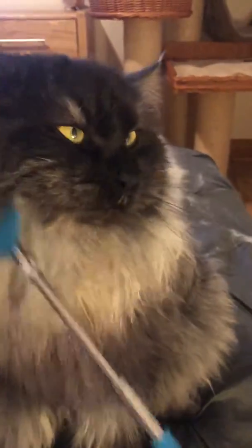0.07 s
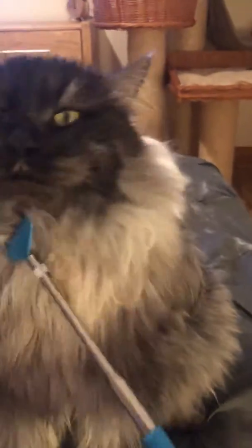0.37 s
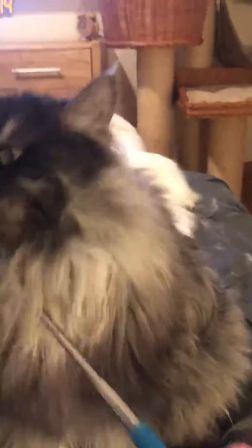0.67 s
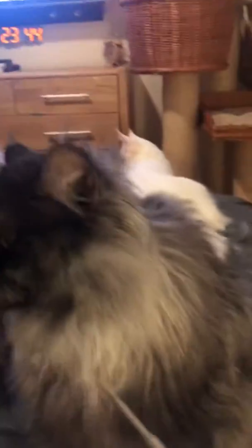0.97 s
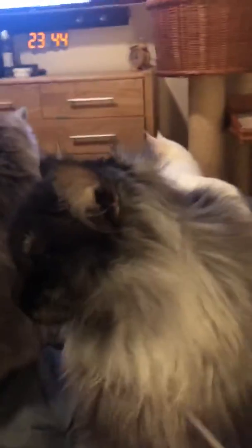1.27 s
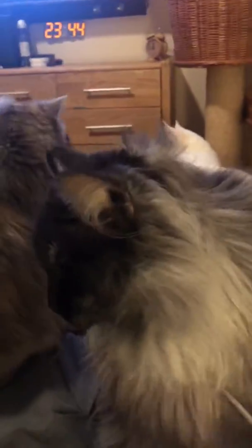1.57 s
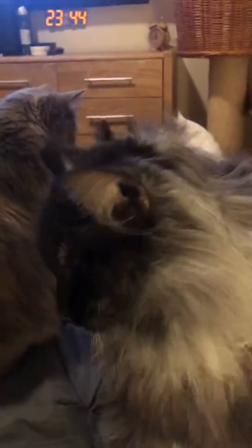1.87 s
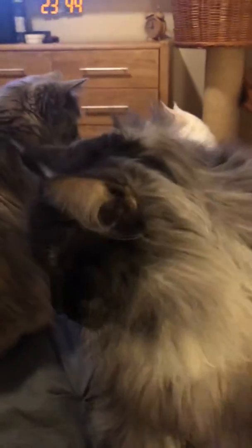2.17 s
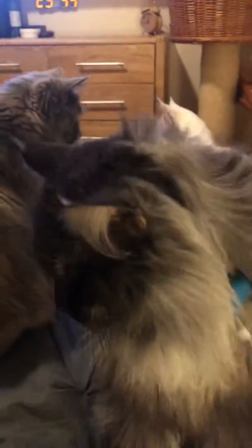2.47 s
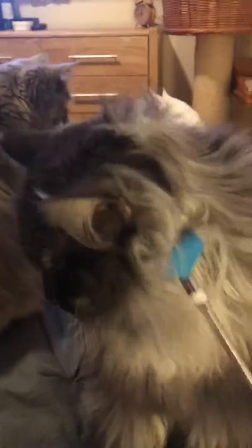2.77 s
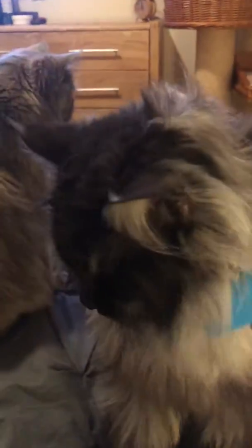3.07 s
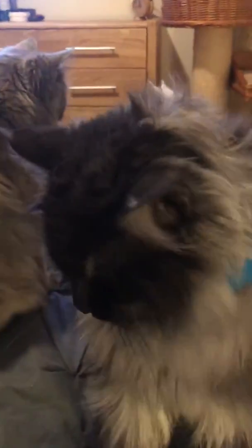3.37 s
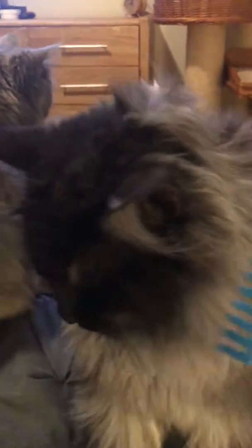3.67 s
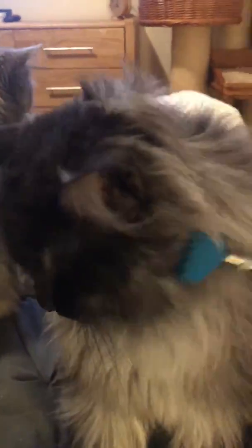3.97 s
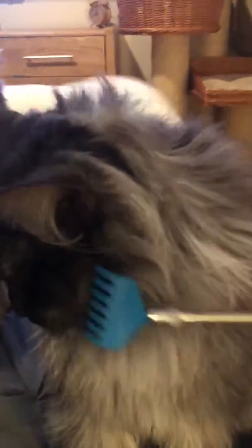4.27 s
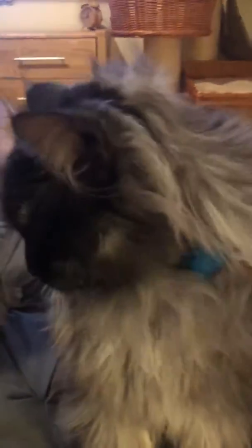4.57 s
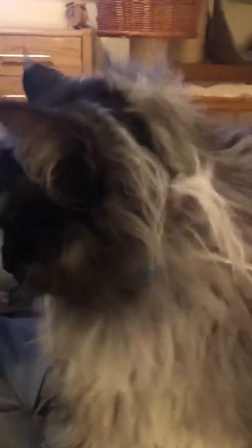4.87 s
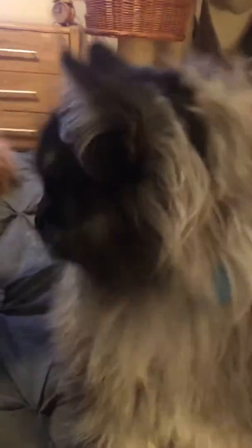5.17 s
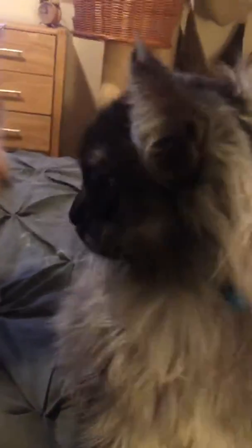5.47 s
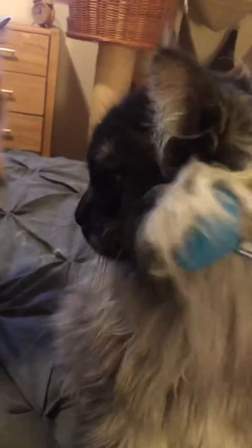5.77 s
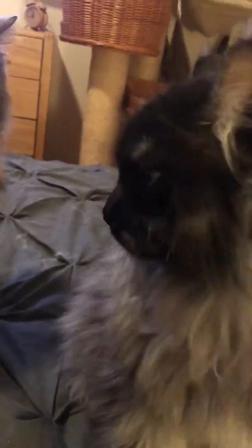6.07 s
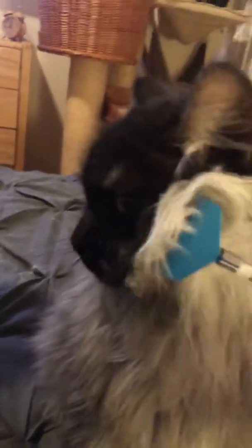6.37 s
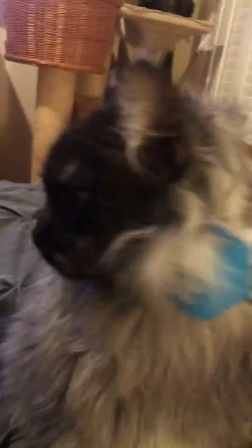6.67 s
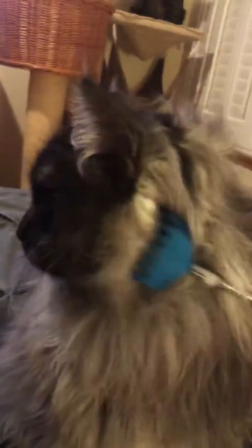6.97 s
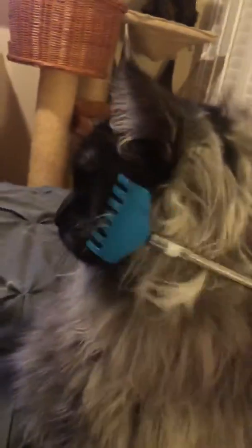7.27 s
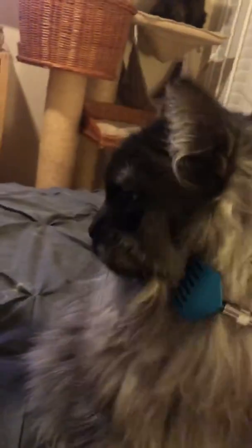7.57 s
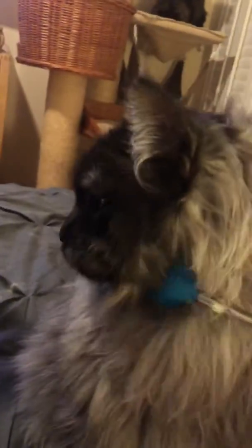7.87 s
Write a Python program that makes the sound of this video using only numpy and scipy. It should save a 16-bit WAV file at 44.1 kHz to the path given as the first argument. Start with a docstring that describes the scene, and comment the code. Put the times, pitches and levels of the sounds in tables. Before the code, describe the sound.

A plastic scratcher combs softly through a cat's fur in a quiet room, with a few dull handling bumps and one harder drag.

```python
"""A quiet room, microphone close to a long-haired cat on a bed, a faint mains hum underneath throughout.
A plastic scratcher on a thin telescopic steel rod starts with light strokes: hairs slip off the tines and
make the rod ring faintly, the fur swishes, and deeper strokes rub the coat. From about 4 s come dull
handling bumps, light knocks and shifting bedding. At 5 s the scratcher tears through a tangle and drags
hard; a few more knocks follow near 6 s, then the strokes are gentle again."""
import sys
import numpy as np
from scipy import signal
from scipy.fft import rfft, irfft, next_fast_len
from scipy.io import wavfile

SR = 44100
rng = np.random.default_rng(int(sys.argv[2]) if len(sys.argv) > 2 else 0)


def wav_out(sig):
    """Save sig, one row per channel (or a flat mono array), as 16-bit PCM at SR to the path in sys.argv[1]."""
    wavfile.write(sys.argv[1], SR, np.round(np.clip(np.atleast_2d(sig).T, -1, 1) * 32767).astype(np.int16))


N = 349713
TIME = np.arange(N) / SR
FREQS = np.maximum(np.fft.rfftfreq(next_fast_len(N, True), 1 / SR), 1)

# Levels are relative: each source applies its own gain on top.
# room tone: (frequency [Hz], level [dB])
AIR_COLOUR = [(15, -19), (25, -40), (44, -2), (71, -8.5), (101, -4), (129, -11.5), (198, -5), (221, -9.5),
              (523, -13.5), (614, -16.5), (684, -16.5), (1110, -19), (5010, -30.5), (6210, -31),
              (15500, -34.5)]
# mains hum: (frequency [Hz], level [dB])
HUM_PARTIALS = [(100, -75.5), (200, -82.5)]
# the hum swells as the microphone moves: (time [s], level [dB])
HUM_SWELL = [(0, 3), (1, -3.5), (2.2, 6.5), (3.3, -3), (5, 6.5), (6.4, -3), (7.2, 6), (7.93, 5)]

# the bedding shifts under cat and arm: (time [s], length [s], level [dB])
BEDDING_SHIFTS = [(0.646, 0.34, -74), (1.5, 0.99, -73), (3.8, 0.3, -63.5), (4.097, 0.1, -51.5),
                  (4.25, 0.07, -55.5), (4.966, 0.11, -52.5), (5.27, 0.24, -66), (5.723, 0.21, -64),
                  (7.15, 0.7, -74)]
# spectra of the quilt and of scuffed cloth: (frequency [Hz], level [dB])
BEDDING_COLOUR = [(40, 4), (70, 5.5), (130, 6), (220, 2.5), (420, -6), (800, -26), (2000, -20), (8000, -34)]
CLOTH_COLOUR = [(60, -3), (320, 3), (600, -4), (1000, -11.5), (2000, -16.5), (4000, -19), (8000, -29),
                (15000, -32)]
# light knocks and ticks of the tool: (time [s], level [dB], pitch [Hz])
KNOCKS = [(0.451, -57.5, 4930), (1.834, -57, 1550), (2.172, -57, 5500), (3.042, -59, 2600),
          (3.071, -51, 1100), (4.166, -44, 700), (4.185, -39.5, 550), (4.203, -46, 545), (5.914, -48, 1700),
          (5.920, -42, 5400), (5.924, -39, 854), (5.935, -41.5, 570), (5.944, -44, 560),
          (7.139, -56.5, 6000)]
# one sharper rap on the rod: (time [s], level [dB])
RAP = (4.175, -36)
# dull handling bumps: (time [s], level [dB], pitch [Hz], cloth scuff [dB])
BUMPS = [(0.771, -60.5, 150, -89), (0.951, -56, 140, -74), (1.698, -61.5, 188, -74), (2.847, -64, 195, -83),
         (3.036, -69, 233, -99), (4.18, -51.5, 176, -62), (4.510, -25.5, 250, -42.5),
         (4.533, -20, 181, -57.5), (4.612, -21.5, 243, -44.5), (4.637, -22, 208, -71),
         (4.811, -30, 207, -51.5), (4.824, -25.5, 138.6, -61), (4.974, -45, 221, -72),
         (4.984, -35.5, 170, -78), (5.010, -41.5, 123, -82), (5.287, -50, 171, -72), (7.904, -49, 136, -67)]
# low modes the bumps set ringing: (frequency [Hz], level [dB], t60 [s])
BUMP_MODES = [(113, 4.5, 0.26), (154.8, -6, 0.42), (190.9, 10.5, 0.18), (227, 12.5, 0.125), (314, 1, 0.1),
              (366, 4.5, 0.072), (465, 5.5, 0.09), (552, -2, 0.11), (650, 3, .16), (765, 3, .16)]

# a tine snags on a tuft and snaps free: (time [s], level [dB])
SNAGS = [(0.608, -66.5), (0.752, -66), (5.267, -58), (5.305, -54), (5.402, -58), (5.675, -62)]
# the scratcher tears through a tangle: (time [s], attack [s], length [s], level [dB])
TANGLE = (5, 0.022, 0.032, -45)
# modes of its plastic head: (frequency [Hz], width [Hz], level [dB])
HEAD_MODES = [(445, 36, 5), (1130, 360, 1.5), (1550, 77, 3), (2450, 300, 3), (3240, 240, -7),
              (4610, 310, 6.5), (6350, 120, -1), (8900, 270, -3), (10300, 99, -3)]
# the tines sink in and drag through the fur: (time [s], attack [s], length [s], swish [dB], rub [dB])
DRAGS = [(0.595, 0.02, 0.096, -74, -71), (0.73, 0.025, 0.032, -65.5, -67.5),
         (0.871, 0.035, 0.17, -74.5, -77), (1.05, 0.031, 0.06, -70.0, -70.5),
         (1.368, 0.056, 0.11, -69, -70), (1.47, 0.026, 0.111, -75, -77.0),
         (2.075, 0.037, 0.095, -75.5, -75), (2.263, 0.03, 0.206, -79, -86), (2.787, 0.037, 0.043, -76, -72),
         (3.873, 0.052, 0.51, -80, -72), (4.28, 0.055, 0.27, -75.5, -70), (4.847, 0.04, 0.17, -70, -69.5),
         (5.021, 0.027, 0.056, -51, -54), (5.111, 0.033, 0.098, -71, -69.5),
         (5.235, 0.047, 0.049, -55.5, -58.5), (5.29, 0.021, 0.071, -52.5, -57.5),
         (5.383, 0.023, 0.082, -54.5, -60), (5.493, 0.035, 0.08, -66, -69.5),
         (5.638, 0.054, 0.056, -57.0, -70), (5.74, 0.04, 0.156, -74, -75),
         (7.135, 0.064, 0.255, -75.5, -72.5), (7.371, 0.047, 0.108, -66.5, -68),
         (7.494, 0.033, 0.22, -68.5, -73.5), (7.754, 0.026, 0.19, -66.5, -71.5)]
# the swish sinks in pitch as a stroke slows: (time [s], centre [Hz])
SWISH_CENTRE = [(0, 3920), (4.9, 4100), (5.06, 4830), (5.2, 4930), (5.33, 4370), (5.55, 3983), (5.72, 3704),
                (7.93, 3755)]
# the tines skim the coat:
# (time [s], attack [s], length [s], level [dB], rod's lowest mode [dB], rod's top mode [dB])
STROKES = [(0.214, 0.055, 0.071, -68, -4, 8), (0.289, 0.03, 0.064, -76, 2.5, 9),
           (0.589, 0.028, 0.16, -73.5, 2, 1), (1.038, 0.04, 0.11, -75.5, 4, 4),
           (1.43, 0.13, 0.19, -72.5, -2, 0), (1.938, 0.048, 0.13, -71.5, 5, 1),
           (2.329, 0.04, 0.13, -72.5, 2, -3), (2.724, 0.048, 0.15, -69.5, 7, 1),
           (3.007, 0.04, 0.059, -78, -1, 2), (3.319, 0.05, 0.084, -72, -7, -1),
           (3.859, 0.037, 0.093, -72, 2.5, 2), (4.309, 0.092, 0.2, -66, -3, 0),
           (4.838, 0.075, 0.15, -64.5, -5, -5), (5.022, 0.03, 0.042, -51, -5, -11),
           (5.133, 0.05, 0.07, -70, -3, -6), (5.233, 0.053, 0.12, -57.5, -5, -9),
           (5.367, 0.046, 0.041, -60, -3, -7), (5.641, 0.048, 0.048, -60, -7, 0),
           (5.862, 0.08, 0.14, -65, -6, -1), (6.412, 0.05, 0.083, -69.5, -6, -3),
           (6.897, 0.061, 0.091, -69.5, -2.5, -1), (7.362, 0.045, 0.14, -64, -5, 0),
           (7.546, 0.04, 0.045, -74, -3, 0), (7.768, 0.05, 0.14, -64, -5, 4)]
# modes of the steel rod: (frequency [Hz], width [Hz], level [dB])
ROD_MODES = [(5045, 46, 19.5), (7860, 250, 2), (9100, 120, 10.5), (9750, 200, 6.5), (10620, 50, 6),
             (11490, 80, 12.5), (11830, 40, 11), (12850, 240, 6), (14730, 120, 14)]
# spectra of snag, swish, rub and tine hiss: (frequency [Hz], level [dB])
SNAG_COLOUR = [(1000, -12), (2400, 3.5), (4500, 4), (7000, -4), (9500, -2), (15000, -15)]
SWISH_COLOUR = [(1200, -15), (2700, -7.5), (3500, 3.5), (5000, 0), (5900, -5), (8000, -7.5), (11000, -16.5),
                (16000, -37)]
RUB_COLOUR = [(80, -4), (200, 0), (450, 2.5), (700, 2.5), (1100, 4.5), (1700, -0.5), (2500, -1),
              (4000, -12), (9000, -50)]
TINE_COLOUR = [(1000, -11), (2500, -5), (4000, 0.5), (5800, -3), (7000, -2), (9500, -2), (10800, -4.5),
               (12300, -2.5), (14000, -3.5), (16000, -2)]

DRAG_RELEASE_S, DRAG_SAG_DB_PER_S = 0.042, 10.5
DRAG_HISS_DB = -12.5   # tine hiss that goes with a drag, against its swish
RESTING_DB = -81.5   # hairs still tick past the tines between strokes


def from_db(db):
    """Decibels to gain."""
    return 10 ** (np.asarray(db) / 20)


def rms_one(x):
    """Scale to rms 1."""
    return x / np.sqrt(np.mean(x ** 2) + 1e-20)


def level(rows):
    """Gain in time from rows of (time [s], level [dB])."""
    return from_db(np.interp(TIME, *np.transpose(rows)))


def colour(x, points):
    """Filter x by a curve of (frequency [Hz], level [dB]); rms 1."""
    hz, db = np.transpose(points)
    size = next_fast_len(N, True)
    gain = from_db(np.interp(np.log(FREQS), np.log(hz), db))
    return rms_one(irfft(rfft(x, size) * gain, size)[:N])


def drift(rate_hz):
    """Smooth random wander, mostly slower than rate_hz; rms 1."""
    size = next_fast_len(N, True)
    spectrum = rfft(rng.standard_normal(size)) / (1 + (FREQS / rate_hz) ** 2)
    return rms_one(irfft(spectrum, size)[:N])


def grains(per_s, spread_db):
    """Random tiny slips of uneven size; rms 1."""
    slips = (rng.random(N) < per_s / SR) * rng.standard_normal(N)
    return rms_one(slips * from_db(spread_db * rng.standard_normal(N)))


def resonate(x, hz, width_hz):
    """Two-pole resonance with gain 1 at its peak."""
    radius = np.exp(-np.pi * width_hz / SR)
    feedback = [1, -2 * radius * np.cos(2 * np.pi * hz / SR), radius ** 2]
    return signal.lfilter(np.array([1, 0, -1]) * (1 - radius ** 2) / 2, feedback, x + 1e-18)


def add(track, start_s, sound):
    """Lay a sound into a track."""
    start = round(start_s * SR)
    track[start:start + len(sound)] += sound[:N - start]


def movements(rows, release_s, sag_db_per_s):
    """Gain of movements that swell, tire and die away: (time [s], attack [s], length [s], level [dB])."""
    power = np.zeros(N)
    for start, attack, length, db in rows:
        age = TIME[:int((length + 8 * release_s) * SR)]
        swell = np.sin(np.pi / 2 * np.minimum(age / attack, 1)) ** 2
        fade = np.exp(-np.maximum(age - length, 0) / release_s)
        add(power, start, (from_db(db - sag_db_per_s * age) * swell * fade) ** 2)
    return np.sqrt(power)


def room(x, wet_db, t60_s=0.29, wall_hz=7000):
    """The direct sound plus the short, diffuse tail of a furnished room."""
    t = TIME[:SR // 2]
    envelope = np.exp(-np.log(1000) * t / t60_s) * (1 - np.exp(-t / 0.003))
    tail = signal.lfilter(*signal.butter(1, wall_hz, fs=SR), envelope * rng.standard_normal(len(t)))
    return x + from_db(wet_db) * signal.fftconvolve(x, tail / np.linalg.norm(tail))[:N]


def room_tone(air_db=-68):
    """Still air and a faint mains hum that swells and sinks at the microphone."""
    hum = sum(np.sqrt(2) * from_db(db) * np.sin(2 * np.pi * (hz * TIME + rng.random()))
              for hz, db in HUM_PARTIALS)
    return from_db(air_db) * colour(rng.standard_normal(N), AIR_COLOUR) + hum * level(HUM_SWELL)


def bedding(attack_s=0.05):
    """Folds of the quilt settle in many small muffled slips."""
    shifts = [(start, attack_s, length, db) for start, length, db in BEDDING_SHIFTS]
    shifting = movements(shifts, release_s=0.049, sag_db_per_s=3)
    return shifting * colour(grains(per_s=900, spread_db=2), BEDDING_COLOUR)


def knocks(slide_s=0.0078, damping=0.65, grit_db=-17, crack_db=-17):
    """Each knock is a click and a brief gritty slide, ringing a cycle or two, with a fine crack on top."""
    out, t = np.zeros(N), TIME[:SR // 10]
    for start, db, hz in KNOCKS:
        contact = (t == 0) + from_db(grit_db) * rng.standard_normal(len(t)) * np.exp(-t / slide_s)
        crack = from_db(crack_db) * resonate(contact, hz=2000, width_hz=2000)
        softening = signal.butter(2, min(7 * hz, SR / 3), fs=SR)   # low knocks are softer contacts
        knock = signal.lfilter(*softening, resonate(contact, hz, damping * hz) + crack)
        add(out, start, from_db(db) * knock / np.abs(knock).max())
    return out


def rap(start_hz=2900, glide_s=0.000623, decay_s=0.0054):
    """Bending waves in the rod carry the highs ahead of the lows: a very fast falling chirp."""
    out, t = np.zeros(N), TIME[:SR // 20]
    start, db = RAP
    phase = 2 * np.pi * start_hz * glide_s * np.log1p(t / glide_s)
    envelope = (1 - np.exp(-t / glide_s)) * np.exp(-(t / decay_s) ** 2)
    add(out, start, from_db(db) * envelope * np.sin(phase))
    return out


def bumps(push_db=-2.5, give_cycles=0.4, scuff_rise_s=0.0014, scuff_decay_s=0.04, cloth_db=3):
    """Each padded contact rebounds for a few cycles and scuffs the cloth; both set low modes booming."""
    pushes, scuffs, t = np.zeros(N), np.zeros(N), TIME[:SR // 2]
    scuff = (1 - np.exp(-t / scuff_rise_s)) * np.exp(-t / scuff_decay_s)
    for start, db, hz, scuff_db in BUMPS:
        age = hz * t / give_cycles
        swell = (age / 2) ** 2 * np.exp(2 - age)   # the padding takes the blow gradually; peak 1
        add(pushes, start, from_db(db + push_db) * swell * np.sin(2 * np.pi * hz * t))
        add(scuffs, start, from_db(scuff_db + cloth_db) * scuff)
    contact = pushes + scuffs * colour(rng.standard_normal(N), CLOTH_COLOUR)
    boom = sum(from_db(db) * resonate(contact, hz, np.log(1000) / (np.pi * t60))
               for hz, db, t60 in BUMP_MODES)
    return contact + boom


def snags(attack_s=0.0044, hold_s=0.012, release_s=0.016):
    """A snagged tuft lets go in a short, crisp burst of slips."""
    bursts = movements([(start, attack_s, hold_s, db) for start, db in SNAGS], release_s, DRAG_SAG_DB_PER_S)
    return bursts * colour(grains(per_s=7600, spread_db=4), SNAG_COLOUR)


def tangle(release_s=0.04):
    """Knotted hairs tear free and set the plastic head ringing."""
    tearing = grains(per_s=4600, spread_db=2.5)
    head = sum(from_db(db) * resonate(tearing, hz, width) for hz, width, db in HEAD_MODES)
    return movements([TANGLE], release_s, DRAG_SAG_DB_PER_S) * rms_one(head)


def drag_levels():
    """Gains in time of the deeper strokes: drag makes the swish, pressure the rub."""
    drag = movements([(*timing, db) for *timing, db, _ in DRAGS], DRAG_RELEASE_S, DRAG_SAG_DB_PER_S)
    pressure = movements([(*timing, db) for *timing, _, db in DRAGS], DRAG_RELEASE_S, DRAG_SAG_DB_PER_S)
    return drag, pressure


def fur(drag, pressure, swish_db=0.5, rub_db=-0.5, band_db=-6.5, band_spread_hz=380, linger_s=0.015):
    """Tufts give way unevenly: a fine swish, a narrow gliding hiss that lingers, a duller rub below."""
    tufts = from_db(drift(rate_hz=42))   # about 1 dB either way
    phase = 2 * np.pi * np.cumsum(np.interp(TIME, *np.transpose(SWISH_CENTRE))) / SR
    band = rms_one(drift(band_spread_hz) * np.cos(phase) + drift(band_spread_hz) * np.sin(phase))
    pole = np.exp(-1 / (linger_s * SR))
    settling = signal.lfilter([1 - pole], [1, -pole], drag)   # hairs fall back behind the tines
    swish = from_db(swish_db) * drag * colour(grains(per_s=16000, spread_db=3), SWISH_COLOUR)
    rub = from_db(rub_db) * pressure * colour(grains(per_s=6000, spread_db=1), RUB_COLOUR)
    return tufts * (swish + from_db(band_db) * settling * band + rub)


def rod(stroke, bite_db=-74, buried_db=-62, gain_db=0.5, wander_db=2.1):
    """The steel rod rings once the tines bite; its ring stops growing when they are buried in fur."""
    drive = stroke / np.sqrt(1 + (stroke / from_db(buried_db)) ** 2 + (from_db(bite_db) / stroke) ** 2)
    plucks = drive * grains(per_s=14000, spread_db=4)
    lowest, *middle, top = [
        from_db(db + gain_db + wander_db * drift(rate_hz=3.1)) * resonate(plucks, hz, width)
        for hz, width, db in ROD_MODES]
    # grip and angle change from stroke to stroke and favour the modes differently
    starts, _, lengths, _, lowest_dbs, top_dbs = np.transpose(STROKES)
    midpoints = starts + lengths / 2
    lowest_gain = from_db(np.interp(TIME, midpoints, lowest_dbs))
    top_gain = from_db(np.interp(TIME, midpoints, top_dbs))
    return lowest * lowest_gain + sum(middle) + top * top_gain


def tines(drag, gain_db=1.26, flutter_db=0.87):
    """Thousands of hairs a second flick off the tines, hissing and plucking the rod."""
    skim = movements([row[:4] for row in STROKES], release_s=0.027, sag_db_per_s=6)
    stroke = np.sqrt(skim ** 2 + (from_db(DRAG_HISS_DB) * drag) ** 2 + from_db(RESTING_DB) ** 2)
    stroke *= from_db(flutter_db * drift(rate_hz=52))
    hiss = stroke * colour(grains(per_s=16000, spread_db=-1.5), TINE_COLOUR)
    return from_db(gain_db) * (hiss + rod(stroke))


def scene():
    """One microphone close to the combing; the knocks carry more of the room."""
    drag, pressure = drag_levels()
    combing = room(tines(drag) + fur(drag, pressure) + tangle() + snags(), wet_db=-13)
    handling = room(bumps(), wet_db=-13) + room(knocks() + rap(), wet_db=-8.5) + bedding()
    return (combing + handling + room_tone())[None]


def record(dry, low_cut_hz=43, high_cut_hz=15660):
    """The microphone drops the deep bass; the top is cut steeply."""
    low_cut = signal.butter(6, low_cut_hz, "high", fs=SR, output="sos")
    high_cut = signal.ellip(12, 0.1, 80, high_cut_hz, fs=SR, output="sos")
    return signal.sosfilt(high_cut, signal.sosfilt(low_cut, dry))


dry = scene()
out = record(dry)
wav_out(out)
```